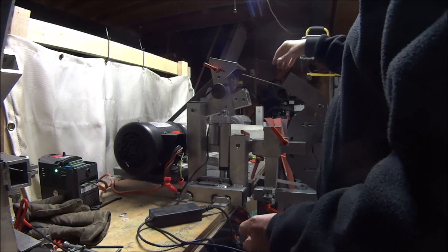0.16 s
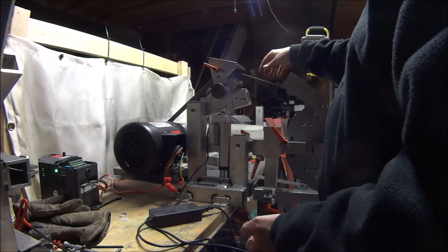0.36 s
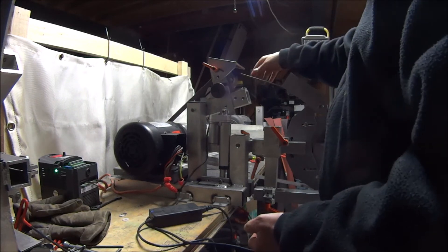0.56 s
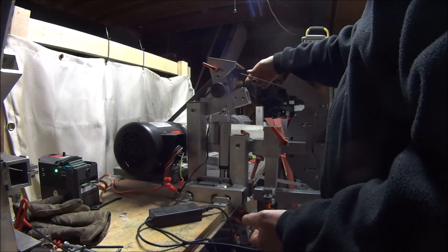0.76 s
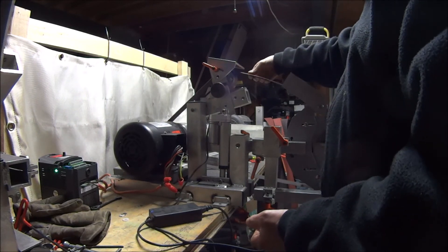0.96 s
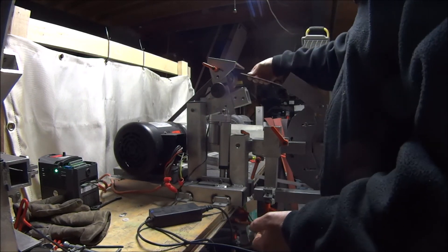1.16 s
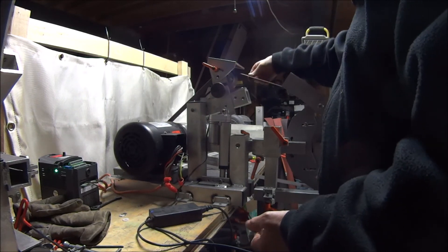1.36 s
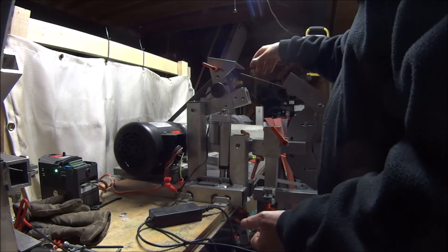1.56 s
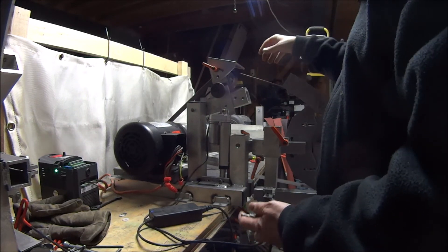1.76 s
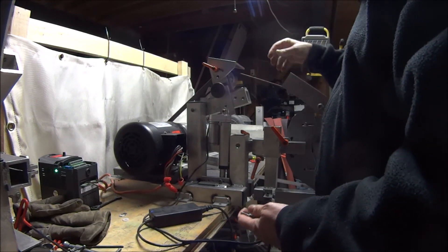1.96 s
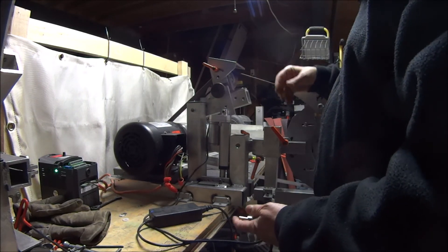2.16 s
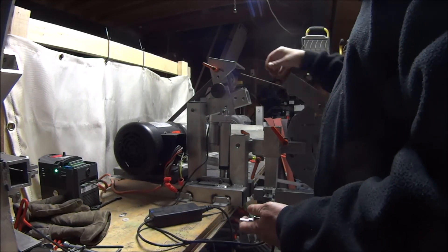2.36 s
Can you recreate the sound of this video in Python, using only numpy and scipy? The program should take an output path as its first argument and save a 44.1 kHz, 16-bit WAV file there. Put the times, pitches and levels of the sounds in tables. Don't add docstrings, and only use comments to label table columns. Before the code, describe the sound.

In a small workshop, a switch clicks and a little gear motor buzzes harshly, then stops; a soft sleeve brush, light clicks, a shorter, slightly higher buzz and a loud snap, over quiet fan whine and room hush.

```python
import sys
import numpy as np
from scipy import signal
from scipy.fft import rfft, irfft
from scipy.io import wavfile
from scipy.ndimage import uniform_filter1d

SR = 44100
rng = np.random.default_rng(int(sys.argv[2]) if len(sys.argv) > 2 else 0)


def persist_wave(psi):
    counts = np.round(np.clip(psi, -1, 1) * 32767).astype(np.int16)
    wavfile.write(sys.argv[1], SR, np.atleast_2d(counts).T)


def invert_db(level):
    return 10 ** (np.asarray(level, dtype=float) / 20)


N = 105840
T = np.arange(N) / SR
F = np.maximum(np.arange(N // 2 + 1) * SR / N, 1)
IDLER = 5 / 6


def level(x, db):
    return x * invert_db(db) / np.sqrt(np.mean(x ** 2))


def over_hz(table):
    hz, value = np.array(table).T
    return np.interp(np.log(F), np.log(hz), value)


def colour(x, table):
    return irfft(rfft(x) * invert_db(over_hz(table)), N)


def ring(x, hz, width_hz):
    return signal.lfilter(*signal.iirpeak(hz, hz / width_hz, SR), x)


def walk(rate_hz):
    k = int(SR / rate_hz)
    steps = np.repeat(rng.standard_normal(N // k + 1), k)
    w = uniform_filter1d(uniform_filter1d(steps, k), k)[:N]
    return w / w.std()


def decay(u, t60):
    return np.exp(-np.log(1000) * u / t60)


def fan_air():
    # centre in Hz, width in Hz, level in dB rms.
    case = [(1228, 180, -74.5), (1673, 200, -74), (2860, 400, -66), (3320, 620, -69.5), (3645, 72, -72.5),
            (4970, 1260, -67), (7420, 1900, -71)]
    air = np.zeros(N)
    for hz, width_hz, db in case:
        band = ring(ring(rng.standard_normal(N), hz, width_hz), hz, width_hz)
        air += invert_db(1.1 * walk(12.0)) * level(band, db)
    return air


def fan():
    # whine frequency in Hz, level in dB rms.
    whine = [(1270, -83), (1690, -78), (2116, -83), (2537, -66.5), (2961, -72), (3025, -80), (3806, -77),
             (4834, -78), (4867, -80), (5335, -80), (7187, -86)]
    side_db = -9
    drift = np.cumsum(1 + 0.00037 * walk(3.03)) / SR
    lines = np.zeros(N)
    for hz, db in whine:
        tone = np.sin(2 * np.pi * (hz * drift + rng.random()))
        lines += np.sqrt(2) * invert_db(db + 1.3 * walk(8.5)) * tone
    return lines + fan_air(), invert_db(side_db) * (fan_air() + np.roll(lines, 3))


def hush():
    # frequency in Hz, density in dB per Hz, for the mid.
    mid_curve = [(12, -38), (20, -12.5), (100, -7.5), (145, -6.5), (179, -6.5), (1640, -11.5), (1830, -14),
                 (2570, -7), (11000, -17), (14300, -120), (22000, -120)]
    # frequency in Hz, density in dB per Hz, for the side.
    side_curve = [(12, -49), (20, -22), (170, -6), (337, -2.5), (385, 0), (542, -0.5), (725, 1),
                  (2940, -6.5), (11000, -19), (14300, -50), (22000, -120)]
    mid = level(colour(rng.standard_normal(N), mid_curve), -59)
    side = level(colour(rng.standard_normal(N), side_curve), -59)
    return mid, side


def bench():
    # centre in seconds, peak in dB.
    thumps = [
        (.28, -61.5),
        (2.04, -67),
    ]
    thump_hz, thump_s = 155, 0.028
    hum_hz, hum_db = 176, -84
    swell = sum(invert_db(db) * np.exp(-((T - t) / thump_s) ** 2) for t, db in thumps)
    hum = np.sqrt(2) * invert_db(hum_db + 2.5 * walk(6.15)) * np.sin(2 * np.pi * hum_hz * T)
    return swell * np.sin(2 * np.pi * thump_hz * T) + hum


def switch():
    # start in seconds, peak in dB, ring in Hz, body ring in dB, rattle in dB.
    clicks = [
        (.2263, -44.5, 9500, -3, -3),
        (.2288, -43, 8000, -13, -6),
        (.6465, -38, 7900, -4, -2),
        (1.7416, -46, 9600, -13, -3),
        (1.7445, -51, 9300, -3, -2),
        (1.749, -58, 7000, 6, -3),
        (1.936, -52, 7000, -6, -6),
        (1.9845, -51, 7600, -9, -1),
        (1.9893, -47, 7900, 9, -1),
        (2.133, -31, 7700, -18, -11),
    ]
    ring_t60_s, body_hz, body_t60_s = 0.011, 4850, 0.035
    rattle_width_hz, rattle_s, rise_s = 5000, 0.005, 0.0006
    out, u = np.zeros(N), T[:SR // 10]
    for t, db, hz, body_db, rattle_db in clicks:
        snap = decay(u, ring_t60_s) * np.sin(2 * np.pi * hz * u)
        body = invert_db(body_db) * decay(u, body_t60_s) * np.sin(2 * np.pi * body_hz * u)
        noise = level(ring(rng.standard_normal(len(u)), hz, rattle_width_hz), 0)
        rattle = invert_db(rattle_db) * np.exp(-u / rattle_s) * noise
        start = int(t * SR)
        out[start:start + len(u)] += invert_db(db) * (snap + body + rattle) * np.clip(u / rise_s, 0, 1)
    return out


def stroke(rows, speed, housing, orders, beats, song):
    # frequency in Hz, density in dB per Hz, of the broad rasp between resonances.
    rasp_curve = [(900, -28), (1450, -24.5), (1900, -10), (3000, -7), (4000, -11.5), (5000, -5),
                  (7000, -8.5), (11000, -29)]
    rasp_db, rasp_depth = -6.5, 0.37
    idler_depth, tooth_depth, brush_depth = 0.36, 0.8, 0.3
    idler_below_hz, brush_above_hz = 3500, 5500
    ripple_hz = 824
    t, effort_db, song_db = np.array(rows).T
    turns = np.cumsum(np.interp(T, *np.array(speed).T) * (1 + 0.0018 * walk(40.32))) / SR
    ramp = np.clip(np.minimum(T - t[0], t[-1] - T) / 0.0023, 0, 1)
    effort = invert_db(np.interp(T, t, effort_db)) * ramp
    since = np.clip(T, t[0], t[-1]) - (t[0] + t[-1]) / 2
    scatter = invert_db(0.6 * walk(400))

    def gate(depth, per_turn):
        return (1 + depth * np.cos(2 * np.pi * per_turn * turns)) ** 2

    def force(hz):
        if hz < idler_below_hz:
            knocks = gate(idler_depth, IDLER)
        else:
            knocks = gate(tooth_depth, 2) * gate(brush_depth * (hz > brush_above_hz), 4)
        return level(scatter * knocks, 0)

    body = np.zeros(N)
    for hz, width_hz, db, grow_db in housing:
        load = invert_db(grow_db * since - 0.5 * walk(25.2))
        push = force(hz) * effort * load * rng.standard_normal(N)
        body += invert_db(db) * np.sqrt(SR / width_hz / 20) * ring(push, hz, width_hz)
    rasp = effort * level(colour(gate(rasp_depth, 2) * rng.standard_normal(N), rasp_curve), rasp_db)

    on = slice(int(t[0] * SR), int(t[-1] * SR))
    cycles = [k * turns[on] for k in orders]
    cycles += [k * turns[on] - ripple_hz * T[on] for k in beats]
    tones = np.zeros(N)
    for cycle, (db, grow_db) in zip(cycles, song):
        loudness = invert_db(db + grow_db * since[on] + 1.0 * walk(20)[on])
        tones[on] += loudness * np.sin(2 * np.pi * (cycle + rng.random()))
    return np.array([body + rasp, np.sqrt(2) * invert_db(np.interp(T, t, song_db)) * ramp * tones])


def outward_run():
    # time in seconds, effort in dB, song in dB.
    effort = [
        (.226, -61, -66),
        (.245, -42.5, -68),
        (.256, -40, -49.5),
        (.28, -43.5, -41.5),
        (.35, -40.5, -44.5),
        (.42, -41, -42),
        (.52, -39, -44),
        (.61, -40, -43.5),
        (.649, -38.5, -42.5),
        (.66, -65, -50),
    ]
    # time in seconds, shaft speed in turns per second.
    speed = [(.226, 122), (.26, 125.8), (.3, 127), (.36, 126.7), (.42, 125.9), (.47, 125), (.61, 123.5),
             (.662, 123.2)]
    # resonance in Hz, width in Hz, level in dB, growth under load in dB per second.
    housing = [(596, 48, -25.5, -2), (1320, 60, -18.5, -6), (1793, 62, -10.5, -2), (1973, 77, -13, 12),
               (2497, 100, -11.5, 0), (2950, 120, -4, 4), (4556, 100, -4, -17), (4960, 58, 0.5, 13),
               (5060, 130, -6, -6), (6380, 200, -9.5, -9), (6380, 80, -4.5, 1), (6140, 47, -10, -3),
               (7460, 87, -13, 14), (8600, 76, -13, 4)]
    orders = [5, 10, 14, 15, 15.45, 20, 23.17, 36, 38, 40] + [k * IDLER for k in (25, 26, 27, 27.5, 28, 28.5, 29, 29.5, 30, 31)] + [38.77, 39.2, 39.37, 39.66, 40.23, 40.7, 41.7]
    beats = [39, 43, 44, 45, 46, 47, 48, 49, 50, 54, 55, 57, 58, 60, 64]
    # level in dB, growth under load in dB per second.
    song = [(-34, 0), (-12.5, -8), (-19, -8), (-23, 30), (-25, -20), (-18.5, 35), (-20, 0), (-21, -30),
            (-17, -40), (-13, 25), (-24, 20), (-20, -15), (-17.5, 0), (-23, 20), (-14, 25), (-19, 40),
            (-16.5, 20), (-21, 15), (-15, 45), (-20.5, -10), (-17, 0), (-18, 30), (-12, 0), (-13, 40),
            (-18, 30), (-19, 25), (-18, 25), (-26, -30), (-18, -40), (-20, 10), (-17, -40), (-18, 40),
            (-15, 20), (-19, 20), (-23, -20), (-23, 20), (-19.5, -20), (-25, -15), (-23, -30), (-19, 20),
            (-22, 35), (-25, 30)]
    return stroke(effort, speed, housing, orders, beats, song)


def sleeve():
    # centre in seconds, length in seconds, level in dB, centre in Hz.
    brushes = [
        (1.365, 0.021, -56, 5800),
        (1.4, 0.019, -63, 5000),
    ]
    out = np.zeros(N)
    for t, length_s, db, hz in brushes:
        cloth = level(ring(rng.standard_normal(N), hz, 3300), db)
        out += np.exp(-((T - t) / length_s) ** 2) * cloth
    return out


def return_run():
    # time in seconds, effort in dB, song in dB.
    effort = [
        (1.992, -49, -82),
        (2.008, -51.5, -65),
        (2.013, -43, -47),
        (2.05, -45.5, -46),
        (2.084, -45.5, -47.5),
        (2.136, -43, -54.5),
        (2.15, -56, -66),
    ]
    # time in seconds, shaft speed in turns per second.
    speed = [(1.992, 125), (2.024, 127), (2.05, 129.7), (2.12, 130.9), (2.155, 130.9)]
    # resonance in Hz, width in Hz, level in dB, growth under load in dB per second.
    housing = [(1296, 50, -9, -4), (1735, 62, -12, -8), (2050, 170, -9.5, 0), (2540, 120, -9, -4),
               (3000, 170, -1.5, -8), (3700, 120, -16, 0), (4650, 190, 0, -2), (4920, 120, 4, -30),
               (5890, 90, -6, -3), (6100, 150, -15, 2), (6330, 93, -10, 0), (7250, 90, -7.5, -2),
               (7700, 200, -5, 3), (8100, 81, -11, 0)]
    orders = [5, 10, 13, 15, 15.48, 19.48, 20, 22.18, 40] + [k * IDLER for k in (11.5, 12.5, 25.5, 26, 27, 28)] + [35.23, 35.46, 35.77, 36.21, 37.28, 37.79, 38.21, 39.27]
    beats = [33, 39, 41, 43, 45, 47, 51, 53]
    # level in dB, growth under load in dB per second.
    song = [(-11.5, -10), (-18, 0), (-21, 0), (-24, 0), (-15, 0), (-19, 0), (-21, 0), (-15, 0), (-16, -60),
            (-22, 0), (-21, 0), (-19, 0), (-20, 0), (-18, 0), (-19, 0), (-14, 0), (-14, 0), (-14, 0),
            (-15, 0), (-11, -60), (-13, -60), (-13, -60), (-16, -60), (-22, 0), (-20, 0), (-16, 0),
            (-15, 0), (-12, 0), (-18, 0), (-18, 0), (-19, 0)]
    return stroke(effort, speed, housing, orders, beats, song)


def ports(near):
    # frequency in Hz, left over right in dB.
    tilt = [(650, -5.5), (1300, -4), (2050, -3), (2450, -3), (2950, 3), (3500, -3), (4800, -2),
            (9000, -0.5)]
    # frequency in Hz, left ahead of right in radians.
    lead = [(650, 0.57), (1250, 0.47), (1900, 0.74), (2500, 0.64), (3500, -0.6), (4800, 0.026),
            (9000, 0.69)]
    half = invert_db(over_hz(tilt) / 2) * np.exp(0.5j * over_hz(lead))
    spectrum = rfft(near)
    return np.array([irfft(spectrum * half, N), irfft(spectrum / half, N)])


def room(x):
    # band centre in Hz, t60 in seconds, level in dB.
    bands = [(700, .35, -14), (1400, .35, -12), (2900, .27, -14), (5000, .13, -22), (8500, .13, -18)]
    likeness = 0.81
    u = T[:SR // 2]
    tail = np.zeros((2, len(u)))
    for hz, t60, db in bands:
        noise = rng.standard_normal((2, len(u)))
        band = level(ring(ring(noise, hz, hz * 0.72), hz, hz * 0.72), 0)
        fade = decay(u, t60) * np.clip(u / 0.015, 0, 1)
        tail += invert_db(db) * band * fade / np.sqrt(t60 * SR / 14)
    shared = tail[0] * np.sqrt((1 + likeness) / 2)
    apart = tail[1] * np.sqrt((1 - likeness) / 2)
    return signal.fftconvolve(x[None], np.array([shared + apart, shared - apart]), axes=1)[:, :N]


def scene():
    fan_mid, fan_side = fan()
    hush_mid, hush_side = hush()
    mid, side = fan_mid + hush_mid + bench(), fan_side + hush_side
    rattle, song = outward_run() + return_run()
    rattle = rattle + switch() + sleeve()
    song_room_db = -12
    direct = ports(rattle + song)
    return direct + room(rattle + invert_db(song_room_db) * song) + np.array([mid + side, mid - side])


def low_pass(x):
    return signal.sosfilt(signal.butter(12, 11460, fs=SR, output="sos"), x)


def record(dry):
    top_cut = signal.ellip(10, 0.3, 55, 10940, fs=SR, output="sos")
    return low_pass(signal.sosfilt(top_cut, dry))


dry = scene()
out = record(dry)
persist_wave(out)
```